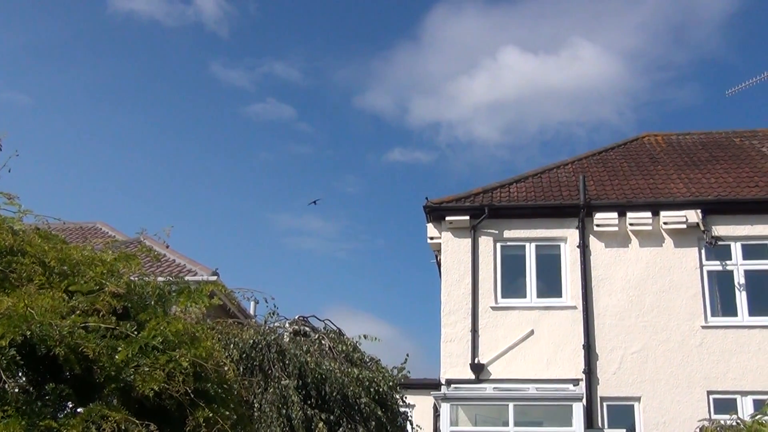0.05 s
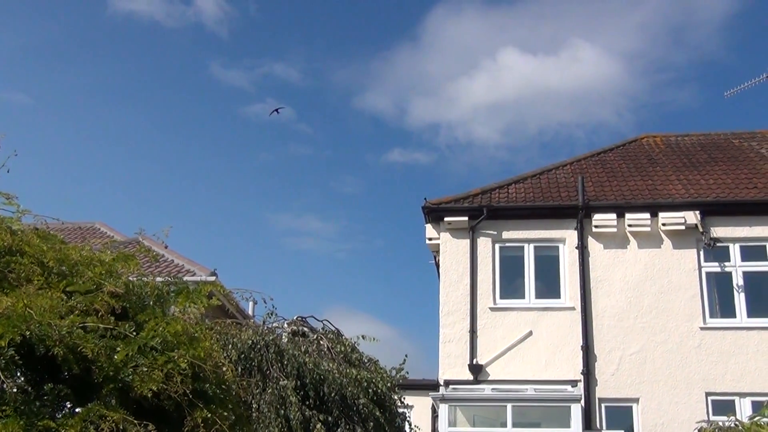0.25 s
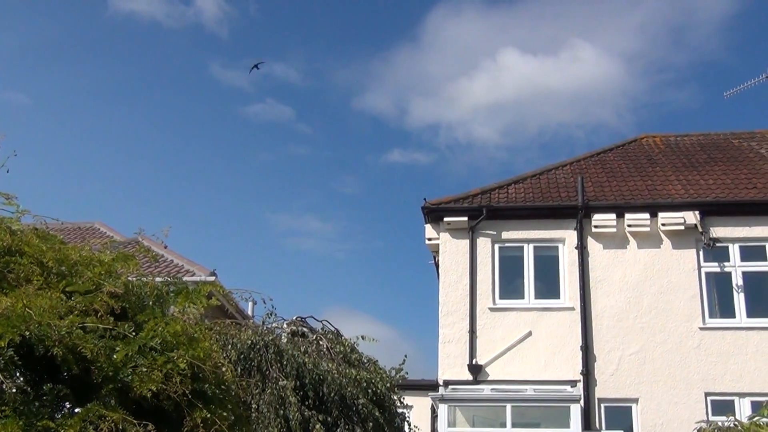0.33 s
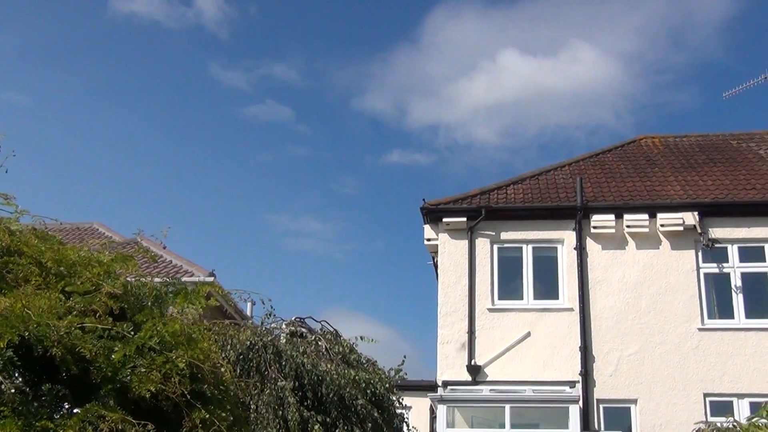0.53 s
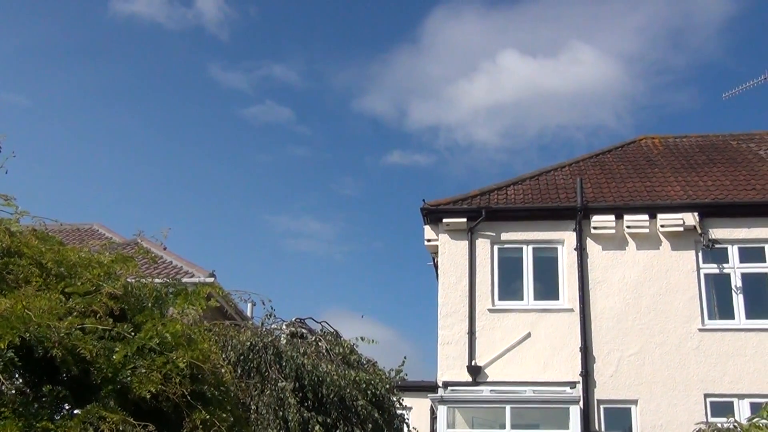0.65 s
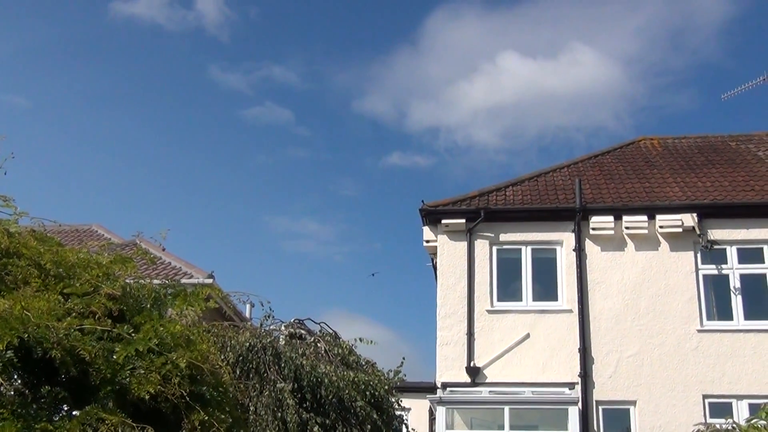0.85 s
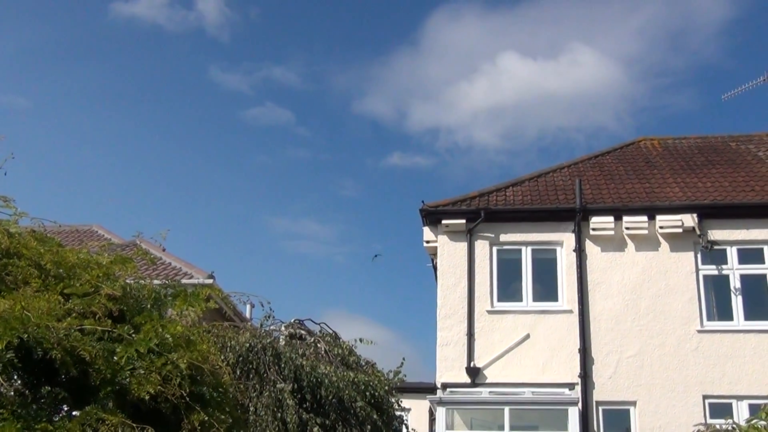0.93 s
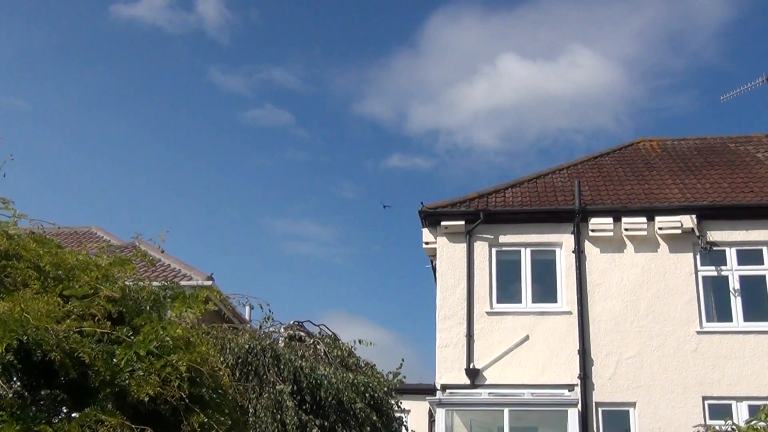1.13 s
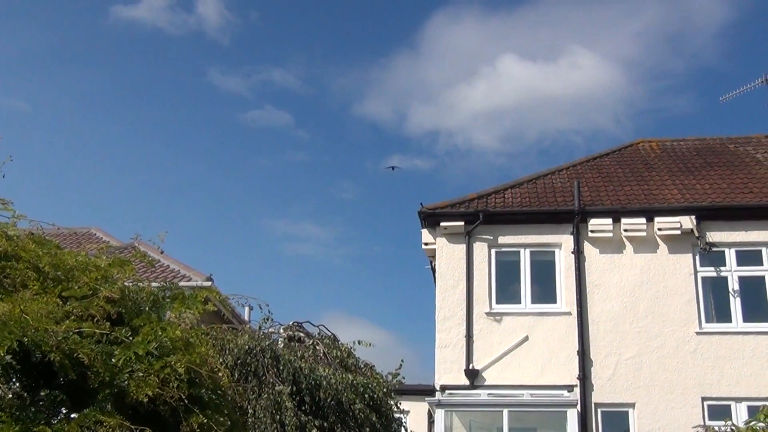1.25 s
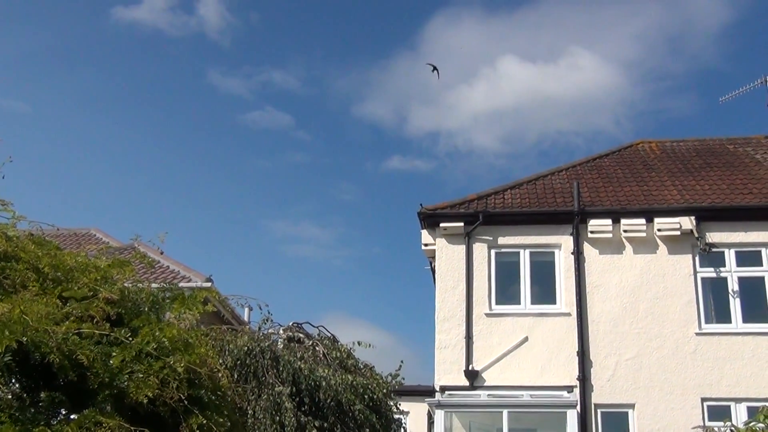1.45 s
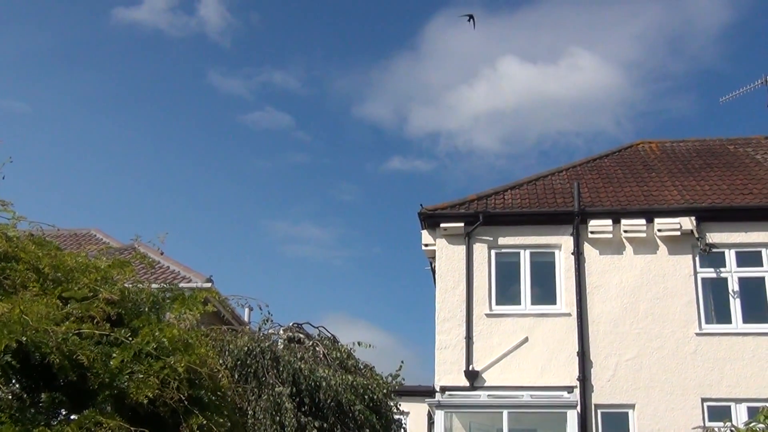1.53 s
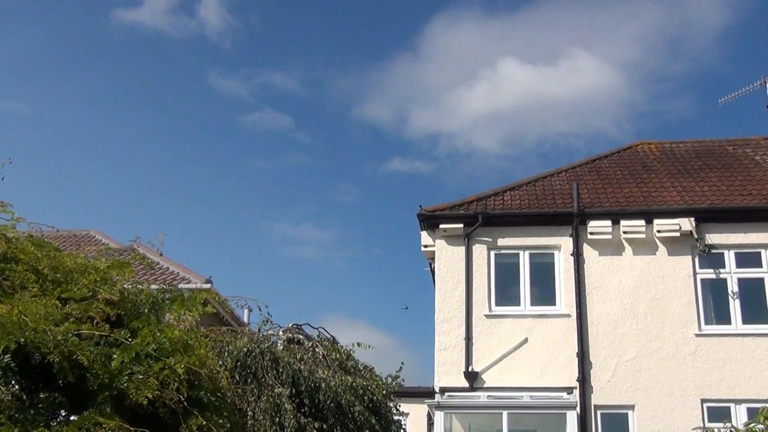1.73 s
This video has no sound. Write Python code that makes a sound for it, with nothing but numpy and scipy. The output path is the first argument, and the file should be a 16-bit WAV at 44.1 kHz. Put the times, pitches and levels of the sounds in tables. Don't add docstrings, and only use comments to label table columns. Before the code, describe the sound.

Swifts scream three times in quick succession, each a high buzzing whistle rising then breaking into a falling trill, with short echoes off house walls, over soft distant traffic rumble and faint air hiss.

```python
import sys
import numpy as np
from scipy import signal
from scipy.io import wavfile
from scipy.ndimage import uniform_filter1d

SR = 44100
rng = np.random.default_rng(int(sys.argv[2]) if len(sys.argv) > 2 else 0)


def bounce(signal):
    frames = np.transpose(np.atleast_2d(signal))
    limited = np.clip(frames, -1, 1)
    pcm = np.round(limited * 32767).astype(np.int16)
    wavfile.write(sys.argv[1], SR, pcm)


def ratio_of_db(decibels):
    return 10 ** (np.asarray(decibels, float) / 20)


N = 79380

# time in seconds, level in dB.
TRAFFIC_LEVEL = [
    (0.0, -42.5),
    (1.8, -40.5),
]
# frequency in Hz, density in dB per Hz.
RUMBLE_SPECTRUM = [(15, -44), (25, -20.5), (243, -2.5), (299, -14), (360, 4), (556, -6.5), (806, 0),
                   (858, -1.5), (3500, -30), (4550, -61), (7700, -120)]
# frequency in Hz, density in dB.
HISS_SPECTRUM = [(1760, -34), (3000, -2), (4630, 2.5), (6040, 4), (7890, 0.5), (16000, -2.5)]
# frequency in Hz, side minus mid in dB.
SIDE_LEVEL = [(30, -52), (60, -53), (180, -38), (550, -19), (1650, -8), (4970, -4.5), (15000, -12)]
# frequency in Hz, left minus right in dB.
BALANCE = [(60, 1.5), (125, 0.2), (400, 1.5), (2400, 1.5), (15000, -1)]
# time in seconds, level in dB.
GUSTS = [
    (0, -60.5),
    (.9, -58.5),
    (1.3, -51.5),
    (1.8, -61),
]
# delay in seconds, left level in dB, right level in dB.
WALL_ECHOES = [
    (.0031, -25, -12.5),
    (.0078, -10.5, -20.5),
    (0.0128, -26, -36),
    (.021, -22, -16.5),
]
# time in seconds, pitch in Hz, level in dB.
FAR_CALLS = [
    [(0, 5900, -89), (.04, 6090, -51), (.1, 5940, -53.5), (.15, 5500, -95)],
    [(0, 5170, -81), (.06, 5380, -56), (.12, 5230, -71), (.16, 4880, -82)],
]
# start in seconds, peak in dB, pitch in Hz, octave partial in dB, length in s.
FIRST_TRILL = [(0.5095, -28, 6500, -8, 0.004), (0.519, -17, 6500, -10, 0.003),
               (0.5308, -17, 6500, -5, 0.004), (0.5425, -14.5, 6460, -6, 0.0055),
               (0.5548, -16, 6400, -4, 0.0055), (0.5677, -19, 6310, -5, 0.0067),
               (0.5804, -19.5, 6220, -7, 0.0067), (0.5945, -20, 6120, -7, 0.0045),
               (0.6076, -23, 6010, -10, 0.0055), (0.622, -22.5, 5850, -9, 0.0035),
               (0.6362, -24, 5560, -12, 0.002)]
SECOND_TRILL = [(0.9615, -27, 5930, -17, 0.003), (.965, -30, 5940, -16, 0.0034),
                (.969, -33, 6300, -16, 0.0018), (0.979, -22, 6405, -7, 0.0093),
                (0.9996, -16, 6550, -10, 0.0047), (1.0188, -21.5, 6170, -10.5, 0.0076),
                (1.0386, -21.5, 6090, -8, 0.0094), (1.059, -23, 5864, -9.5, 0.0058),
                (1.081, -22.5, 5650, -4, 0.0032), (1.1026, -26, 5100, -19, 0.0056),
                (1.1216, -36.5, 3900, -27, 0.011)]
THIRD_TRILL = [(1.4237, -21, 6260, -16, 0.0056), (1.4358, -24, 6200, -9, 0.007),
               (1.4492, -25, 6110, -13, 0.011), (1.4632, -25.5, 6030, -12, 0.009),
               (1.4773, -24, 5950, -11, 0.0055), (1.491, -24.5, 5880, -13, 0.0061),
               (1.506, -29, 5780, -12, 0.005), (1.5207, -30, 5660, -16, 0.005),
               (1.5364, -31, 5560, -16, 0.003)]
# left minus right in dB, half-step partials in dB, click in dB,
# scoop in Hz per Hz below the top note.
TRILL_VOICE = [
    (1.2, -19, -27, 1.3),
    (3, -16, -15, -.2),
    (7, -19, -34, 1.3),
]
# time in seconds, pitch in Hz.
SCREAM_PITCH = [
    [(.2, 4500), (.215, 5490), (.229, 6480), (.238, 5630), (.3, 5990), (.33, 6225), (.362, 6120),
     (.39, 6235), (.508, 6332)],
    [(.688, 4820), (.7, 5370), (.73, 5670), (.76, 6036), (.9, 6120), (.945, 5850), (.972, 6420)],
    [(1.16, 4400), (1.172, 5000), (1.19, 5650), (1.225, 5894), (1.27, 6127), (1.33, 6055), (1.421, 6260)],
]
# time in seconds, level in dB, octave partial in dB, flutter depth 0-1.
SCREAM_LEVEL = [
    [(.2, -61, -16, 0.4), (.208, -41.5, -16.5, 0.37), (.254, -33, -15.5, 0.03), (.28, -35, -2.5, 0.15),
     (.304, -29, -12, 0.35), (.34, -33, -4.5, 0.57), (.472, -24.5, -9.5, 0.48), (.5055, -26, -16, 0.57)],
    [(.688, -48.5, -10, 0.06), (.7, -38.5, -1, 0.1), (.73, -33.5, -11, 0.13), (.786, -34.5, -1.5, 0.16),
     (.824, -30, -15, 0.35), (.88, -31, -13.5, 0.6), (.922, -29.5, -13, 0.56), (.93, -36.5, -13, 0.7),
     (.958, -33, -15, 0.9)],
    [(1.16, -45, -27, 0.4), (1.172, -33, -19, 0.3), (1.222, -27.5, -10, 0), (1.304, -26.5, -14.5, 0.23),
     (1.34, -27, -11, 0.63), (1.4, -28, -12, 0.37), (1.409, -30.5, -11, 0.6), (1.421, -28, -8, .3)],
]
# rate in Hz, half-step partials in dB, rasp in dB, left minus right in dB,
# unsteadiness 0-1, undertone in dB, lead of pitch swing over loudness in radians.
FLUTTER = [
    (250, -22, -28, 2, .65, -30, .6),
    (256, -25, -17, 1.5, .9, -50, 1.1),
    (240, -21, -40, 5.5, .4, -50, .5),
]


def rms_one(x):
    return x / np.sqrt(np.mean(x ** 2) + 1e-20)


def in_time(rows):
    s, *columns = np.transpose(rows)
    return [np.interp(np.arange(N) / SR, s, c) for c in columns]


def at_hz(points, hz):
    table_hz, value = np.transpose(points)
    return np.interp(np.log(hz), np.log(table_hz), value)


def drift(rate_hz):
    r = np.exp(-2 * np.pi * rate_hz / SR)
    noise = rng.standard_normal(N + SR)
    return rms_one(signal.lfilter([1], [1, -2 * r, r * r], noise)[SR:])


def phase_of(hz):
    return 2 * np.pi * np.cumsum(hz) / SR


def pan(db):
    return ratio_of_db([[db / 2], [-db / 2]])


def band_pass(order, band_hz, x):
    return signal.sosfilt(signal.butter(order, band_hz, "band", fs=SR, output="sos"), x)


def low_pass(order, cut_hz, x):
    return signal.sosfilt(signal.butter(order, cut_hz, fs=SR, output="sos"), x)


def line_whine():
    return ratio_of_db(-71) * np.sin(phase_of(np.full(N, 15625)))


def banded_noise(spectrum, low_hz, count, patchy_db):
    out = 0
    edges = low_hz * 2 ** (np.arange(count + 1) / 2)
    white = rng.standard_normal((2, 2, N + SR // 2))
    for k, (low, high) in enumerate(zip(edges, edges[1:])):
        mid, side = band_pass(2, [low, high], white[k % 2])[:, SR // 2:]
        hz = np.sqrt(low * high)
        both = mid + ratio_of_db(at_hz(SIDE_LEVEL, hz)) * side * [[1], [-1]]
        level = ratio_of_db(at_hz(spectrum, hz) + patchy_db * drift(4.5))
        out = out + level * pan(at_hz(BALANCE, hz)) * both
    return rms_one(out)


def traffic_rumble():
    return ratio_of_db(in_time(TRAFFIC_LEVEL)[0]) * banded_noise(RUMBLE_SPECTRUM, 25, count=14, patchy_db=.6)


def air_hiss():
    return ratio_of_db(-57) * banded_noise(HISS_SPECTRUM, 3200, count=5, patchy_db=.3)


def wind():
    low = band_pass(2, [30, 63], rng.standard_normal(N + SR))[SR:]
    return ratio_of_db(in_time(GUSTS)[0]) * rms_one(low)


def idling_engine():
    level = ratio_of_db(-70 + 4.1 * drift(1.8))
    return level * np.sin(phase_of(54.8 + 2.35 * drift(1.66)))


def street(x):
    near_t60_s, far_t60_s, far_db = 0.24, 0.7, -19
    t = np.arange(int(SR * .8)) / SR
    decay = ratio_of_db(-60 * t / near_t60_s) + ratio_of_db(far_db - 60 * t / far_t60_s)
    tail = rng.standard_normal((2, len(t))) * decay * np.clip(t / 0.0032, 0, 1)
    response = ratio_of_db(-6.5) * tail / np.sqrt(np.sum(tail ** 2, axis=1, keepdims=True))
    for s, *db in WALL_ECHOES:
        response[:, int(s * SR)] += ratio_of_db(db)
    wet = signal.fftconvolve(x.mean(axis=0)[None], response, axes=1)[:, :N]
    return low_pass(1, 11000, wet)


def rasp():
    return rms_one(band_pass(3, (6500, 11500), rng.standard_normal(N)))


def whistle(hz, octave_db, half_step_db, blur=0, under_db=-60):
    phase = phase_of(hz)
    octave = ratio_of_db(octave_db) * np.sin(2 * phase + 1 + blur * 0.8)
    three_halves = ratio_of_db(half_step_db) * np.sin(phase * 3 / 2 + blur)
    undertone = ratio_of_db(under_db) * np.sin(phase / 2)
    return np.sqrt(2) * (np.sin(phase) + octave + three_halves + undertone)


def far_swift():
    out = 0
    for rows in FAR_CALLS:
        hz, db = in_time(rows)
        sounding = np.arange(N) < rows[-1][0] * SR
        level = ratio_of_db(db + 3.4 * drift(60))
        out = out + sounding * level * whistle(hz + 50 * drift(170), -54, -32)
    return np.array([out, np.roll(out, 3)])


def trill(notes, side_db, half_step_db, click_db, scoop):
    attack_s, release_s, scoop_s, puff_s = .0007, .0012, .001, .0032
    sag_hz_per_s, limp_hz = 25000, 6200
    out, t, puff = np.zeros(N), np.arange(SR // 40) / SR, rasp()
    top_hz = max(note[2] for note in notes) + 100
    for s, db, hz, octave_db, length in notes:
        opening = 1 - np.exp(-(t / attack_s) ** 2)
        closing = np.exp(-(np.maximum(t - length / 2, 0) / (length / 2 + release_s)) ** 2 * 4.5)
        scoop_hz = scoop * (top_hz - hz) * np.exp(-t / scoop_s)
        sag_hz = sag_hz_per_s * (limp_hz / hz) ** 3 * (t - length / 2)
        tone = whistle(hz - scoop_hz - sag_hz, octave_db, half_step_db) / np.sqrt(2)
        at = slice(int(s * SR), int(s * SR) + len(t))
        click = ratio_of_db(click_db) * puff[at] * np.exp(-t / puff_s)
        out[at] += ratio_of_db(db) * (opening * closing * tone + click)
    return pan(side_db) * out


def buzz(pitch, rows, rate_hz, half_step_db, rasp_db, side_db, unsteady, under_db, lead):
    swing_hz, wander_hz, rate_wander, fading_db, half_step_delay_s = 90, 28.8, 0.0493, 1.5, 0.057
    (hz,), (db, octave_db, depth) = in_time(pitch), in_time(rows)
    hz = uniform_filter1d(hz, size=SR // 120)
    t, start, end = np.arange(N) / SR, rows[0][0], rows[-1][0]
    along = np.clip((t - start) / (end - start), 0, 1)
    onset = (t - start) / half_step_delay_s

    flutter = phase_of(rate_hz * (1 + unsteady * rate_wander * (1 + 3 * along ** 4) * drift(34.0)))
    depth = np.clip(depth * (1 + .2 * drift(25)), 0, .9)
    swing = swing_hz * np.clip(onset, .3, 1) * np.sin(flutter + lead)
    wander = unsteady * wander_hz * (drift(63.0) + along * drift(226))

    late_db = -25 * np.clip(1 - onset, 0, 1) ** .5 - 12 * along ** 12
    overtone_db = (0.42 + 2.0 * depth) * np.sin(flutter - .3)
    octave_db = octave_db + overtone_db + 1.3 * drift(31)
    half_step_db = half_step_db + late_db + 0.33 * overtone_db + 3 * drift(110)
    blur = .9 * np.clip(3 * along, .2, 1) * np.sin(flutter - 1)
    voice = whistle(hz + swing + wander, octave_db, half_step_db, blur, under_db + late_db - 9 * along)

    rasp_level = ratio_of_db(rasp_db + 2.5 * drift(120)) * along ** 2
    voice = voice + rasp_level * (1 + .6 * np.sin(flutter)) * rasp()
    gate = np.clip(np.minimum(t - start, end - t) / 0.0012, 0, 1)
    fading = ratio_of_db(db + fading_db * (unsteady + .3 * along ** 6) * drift(24))
    tremolo = (1 + depth * np.sin(flutter)) / np.sqrt(1 + depth ** 2 / 2)
    return pan(side_db) * gate * fading * tremolo * voice


def scene():
    trills = (FIRST_TRILL, SECOND_TRILL, THIRD_TRILL)
    calls = []
    for pitch, rows, flutter, notes, voice in zip(SCREAM_PITCH, SCREAM_LEVEL, FLUTTER, trills, TRILL_VOICE):
        calls.append(buzz(pitch, rows, *flutter) + trill(notes, *voice))
    calls.append(far_swift())
    echoes = street(sum(calls))
    calls[2] = low_pass(2, 8600, calls[2])
    ambience = traffic_rumble() + air_hiss() + wind() + idling_engine() + line_whine()
    return sum(calls) + echoes + ambience


def top_cut(x):
    return signal.sosfilt(signal.butter(12, 16780, fs=SR, output="sos"), x)


def record(dry):
    mix = signal.sosfilt(signal.cheby2(20, 50, 16000, fs=SR, output="sos"), dry)
    mix = signal.sosfilt(signal.butter(3, 42, "high", fs=SR, output="sos"), mix)
    return top_cut(mix)


dry = scene()
out = record(dry)
bounce(out)
```